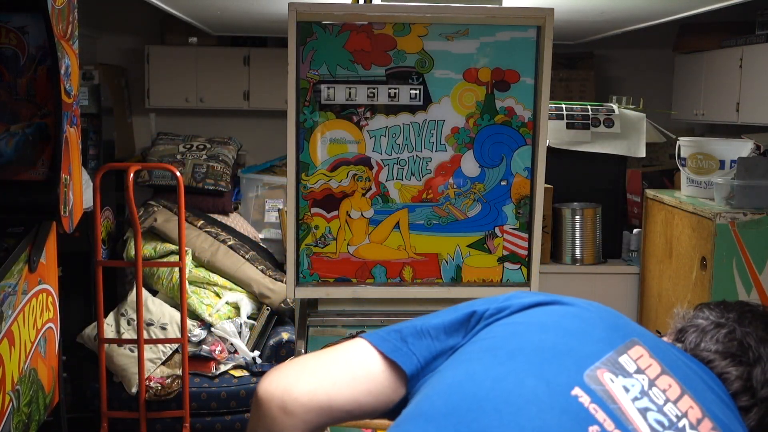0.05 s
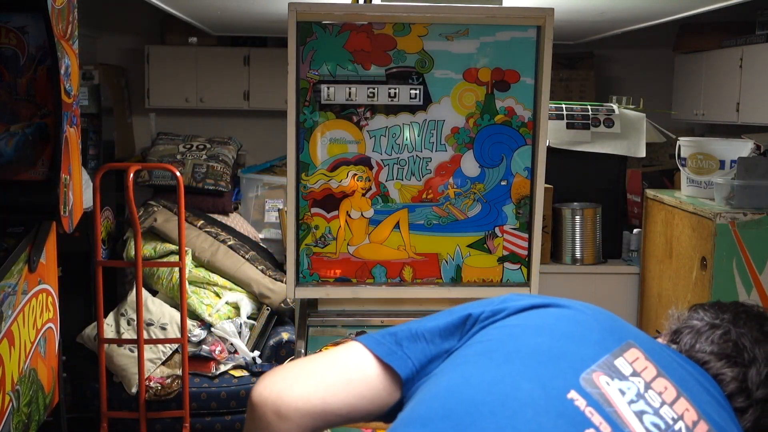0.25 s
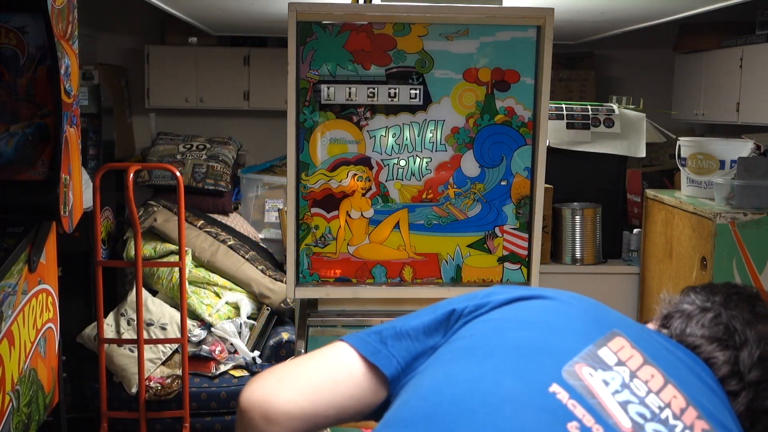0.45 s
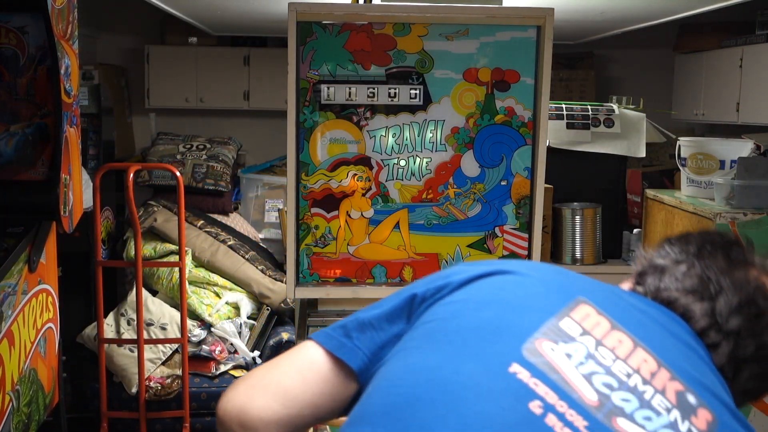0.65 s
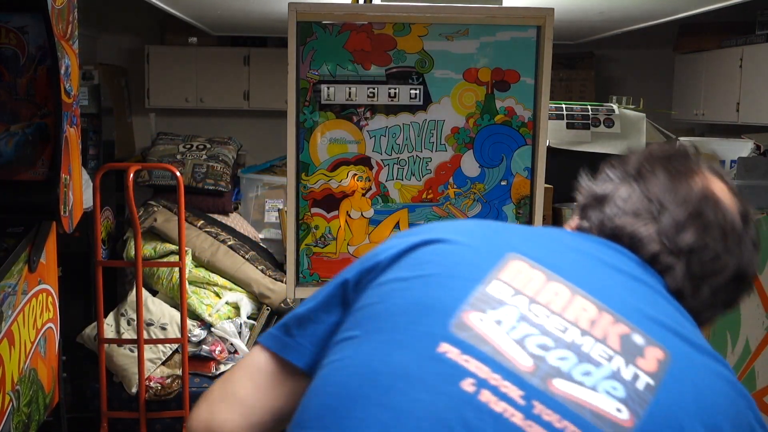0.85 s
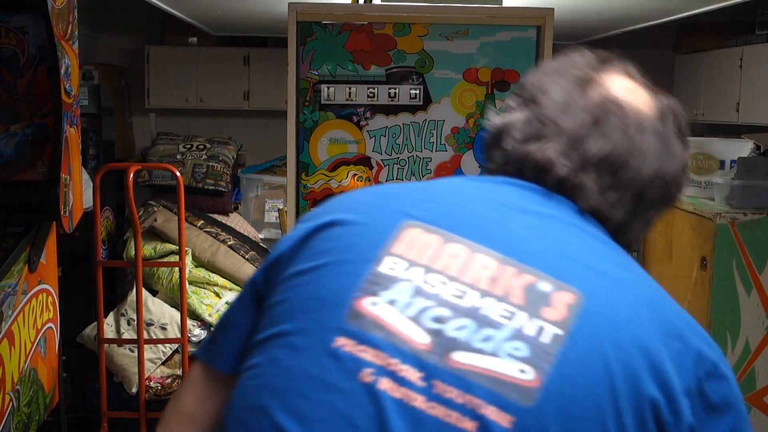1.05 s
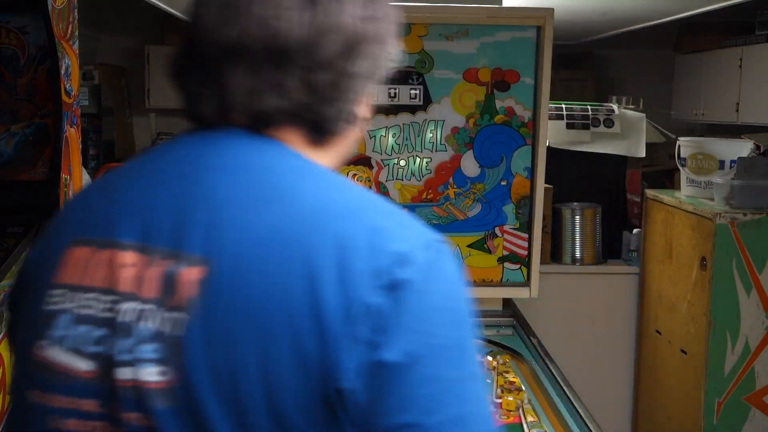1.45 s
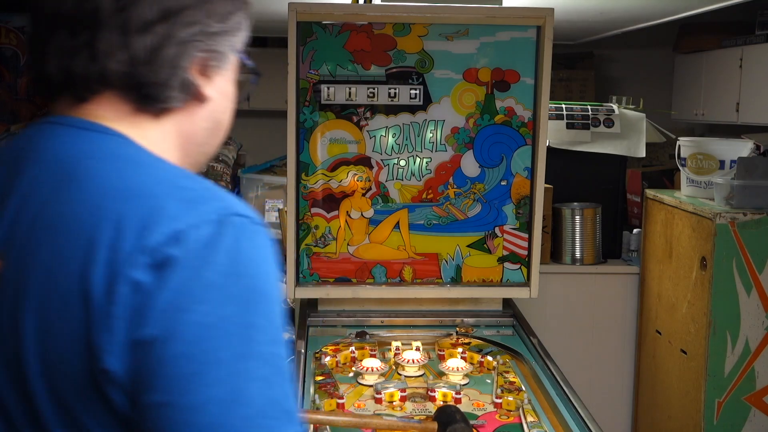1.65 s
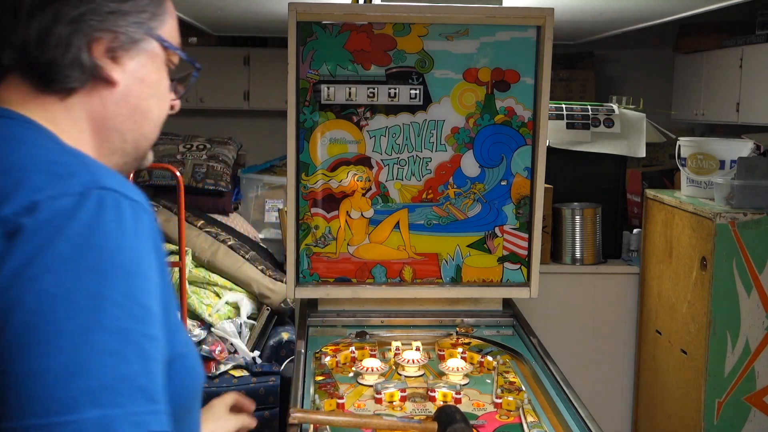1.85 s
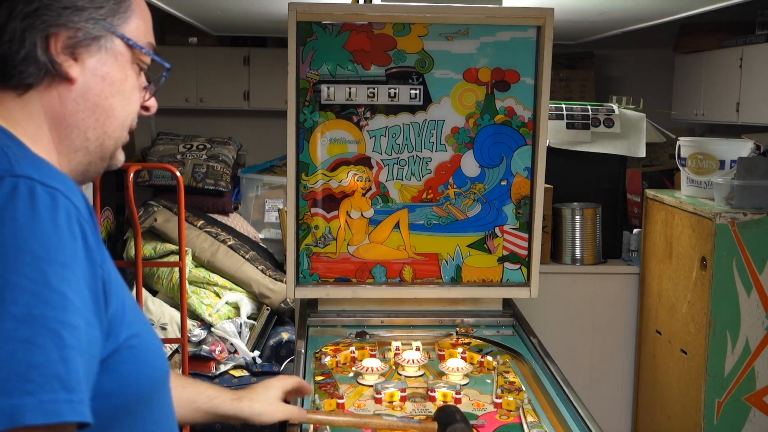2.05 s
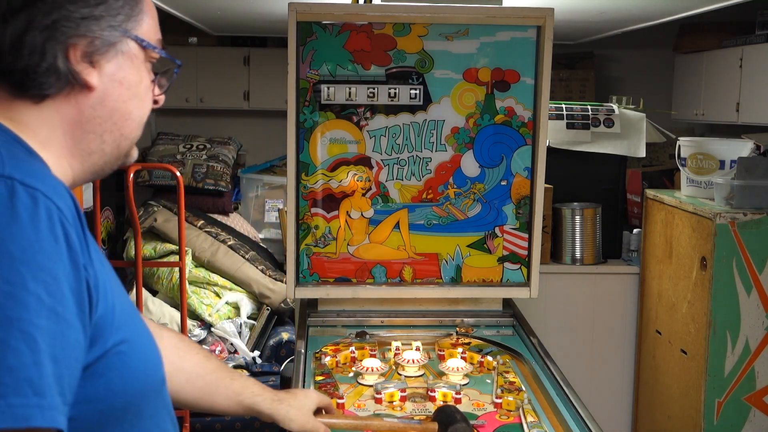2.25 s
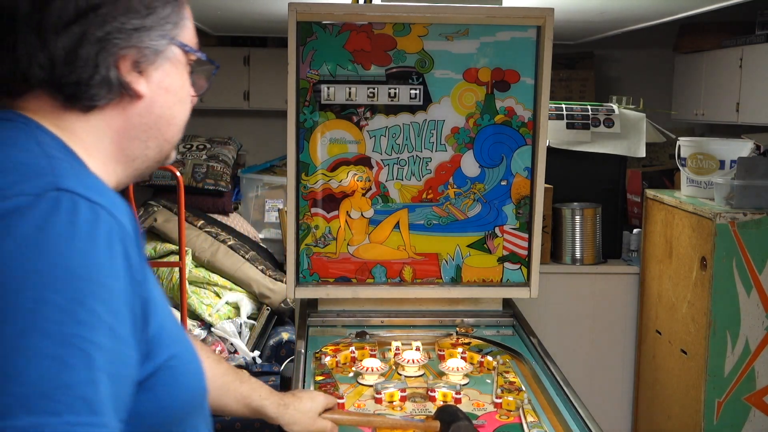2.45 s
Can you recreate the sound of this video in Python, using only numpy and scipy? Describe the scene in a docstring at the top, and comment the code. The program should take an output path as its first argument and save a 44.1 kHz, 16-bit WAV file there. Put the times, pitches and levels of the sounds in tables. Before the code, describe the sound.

A pinball machine resets nearby in a small, faintly humming room. From 0.2 seconds, relays snap rapidly over a whirring motor, with three score reel clacks between 0.4 and 0.8. Around 1.1 comes a louder metallic clatter with a brief buzz and a thin spring ping. At 1.4 the ball is kicked out, knocking on wood; it rolls softly, clicks, and lands with a clunk near 2.2.

```python
"""A small basement workshop, where an electromechanical pinball machine resets over a low hum.
Relays snap, the score motor whirs and steps the score reels three times, a relay bank resets and
a spring pings. A solenoid kicks the ball out; it rolls across the wood and lands with a clunk.
Every hit is one contact and a short chatter, ringing the resonances of the part it strikes."""
import sys
import numpy as np
from scipy import signal
from scipy.fft import rfft, irfft
from scipy.io import wavfile
from scipy.ndimage import uniform_filter1d

SR = 44100
rng = np.random.default_rng(int(sys.argv[2]) if len(sys.argv) > 2 else 0)


def wav_record(signal):
    """Record a signal, one row per channel, as 16-bit PCM in the file named by sys.argv[1]."""
    frames = np.transpose(np.atleast_2d(signal))
    bounded = np.clip(frames, -1, 1)
    # unit amplitude maps onto the largest positive 16-bit level
    quanta = np.round(bounded * 32767).astype(np.int16)
    wavfile.write(sys.argv[1], SR, quanta)


N = 110250
T = np.arange(N) / SR
MONO_BELOW_HZ, TREBLE_HZ = 560, 3980
BUILD_CYCLES = 2  # low notes swell more slowly than high ones
LEFT_RIGHT = np.array([[1], [-1]])


def amp(db):
    """Decibels to gain."""
    return 10 ** (np.asarray(db) / 20)


def along(table, hz, column=1):
    """Read a table column on a log-frequency axis."""
    table = np.array(table, float)
    return np.interp(np.log(np.maximum(hz, 1)), np.log(table[:, 0]), table[:, column])


def running(on_s, off_s, attack_s, release_s):
    """Rise, hold and exponential release."""
    return np.clip((T - on_s) / attack_s, 0, 1) * np.exp(-np.maximum(T - off_s, 0) / release_s)


def waver(rate_hz, depth_db):
    """A gain that drifts at random."""
    hold = int(SR / rate_hz)
    steps = np.repeat(rng.standard_normal(N // hold + 1), hold)
    return amp(depth_db * uniform_filter1d(steps, hold)[:N])


# Stereo image: f/Hz, left minus right/dB, side share/0-1
STEREO = [(600, -.2, .018), (1300, -.7, .028), (2400, -1.3, .085), (4400, -7, .4), (9000, -5.3, .28)]
def noise(colour, width=1, size=N):
    """Coloured noise at rms 1: centred in the bass, wider and to the right in the treble."""
    hz = np.fft.rfftfreq(size, 1 / SR)
    mid, side = np.exp(2j * np.pi * rng.random((2, len(hz))))
    spread = np.minimum(hz / MONO_BELOW_HZ, 1) ** 3
    side_share = spread * np.clip(width * along(STEREO, hz, column=2), 0, .5)
    pair = np.sqrt(1 - side_share) * mid + LEFT_RIGHT * np.sqrt(side_share) * side
    pan = amp(spread * LEFT_RIGHT * along(STEREO, hz) / 2)
    wash = irfft(pair * pan * amp(along(colour, hz)), size)
    return wash / np.sqrt(np.mean(wash ** 2))


def tone(t, hz, t60, phase):
    """One mode that swells within a few cycles and dies away."""
    pan = amp((hz > MONO_BELOW_HZ) * LEFT_RIGHT * along(STEREO, hz) / 2)
    envelope = -np.expm1(-t * hz / BUILD_CYCLES) * amp(-60 * t / t60)
    return pan * np.sqrt(2) * np.sin(2 * np.pi * (hz * t + phase)) * envelope


# Tail of machine and room, per band: f/Hz, t60/s
TAIL = [(110, 0.59), (600, 0.38), (2000, 0.31), (5000, 0.35), (12000, 0.28)]
def ring(body, modes, tail_scale, modes_db, bite=1):
    """A part's answer to one contact: a noisy tail that dies band by band, plus clear modes."""
    size = 32768
    t, hz = T[:size], np.fft.rfftfreq(size, 1 / SR)
    spectrum = rfft(noise(body, size=size))
    direct = 1 + (bite - 1) * np.exp(-t / 0.0069)  # direct sound sharpens the treble attack
    out = 0
    for k, (band_hz, t60) in enumerate(TAIL):
        band = along([(row[0], j == k) for j, row in enumerate(TAIL)], hz)
        envelope = -np.expm1(-t * band_hz / BUILD_CYCLES) * amp(-60 * t / (t60 * tail_scale))
        out += irfft(spectrum * band, size) * envelope * (direct if band_hz > TREBLE_HZ else 1)
    for mode_hz, db, t60 in modes:
        out += amp(db + modes_db) * tone(t, mode_hz, t60, rng.random())
    return out


def strike(hits, part, bass_hz=266):
    """Each hit is one contact and a dying chatter of smaller ones, all ringing the same part."""
    chatter_per_s, chatter_share = 700, 0.45
    out, size = np.zeros((2, N + SR)), part.shape[1]
    hz, response = np.fft.rfftfreq(size, 1 / SR), rfft(part)
    bass_shelf = 1 / (1 + (hz / bass_hz) ** 4)
    treble_shelf = 1 - 1 / (1 + (hz / TREBLE_HZ) ** 4)
    lead = SR // 100  # space for the shelves' pre-ring
    for start, db, bass_db, treble_db, chatter_s in hits:
        contacts = (rng.random(size) < chatter_per_s / SR) * rng.standard_normal(size)
        contacts *= np.exp(-T[:size] / chatter_s)
        contacts *= np.sqrt(chatter_share / (np.sum(contacts ** 2) + 1e-12))
        contacts[0] += np.sqrt(1 - chatter_share)
        hit = rfft(contacts) * response
        hit *= np.linalg.norm(response) / np.linalg.norm(hit)
        hit *= amp(db + bass_shelf * bass_db + treble_shelf * treble_db)
        at = int(start * SR) - lead
        out[:, at:at + size] += np.roll(irfft(hit, size), lead, axis=1)
    return out[:, :N]


# Room air colour, then hum and whine: f/Hz, level/dB
AIR_COLOUR = [(30, -28.5), (103, 2.5), (184, -7), (430, -14.5), (684, -12), (1190, -20.5), (2010, -14),
              (2980, -19), (3580, -29.5), (16000, -35)]
HUM_TONES = [(122, -61.5), (2040, -67)]
def room_tone():
    """A wide, quiet bed of air with electrical hum and a faint whine."""
    hum = 0
    for hz, db in HUM_TONES:
        sine = np.sqrt(2) * np.sin(2 * np.pi * (hz * T + rng.random()))
        hum += amp(db) * sine * waver(5.7, depth_db=1)
    return noise(AIR_COLOUR, width=4.7) * amp(-55) + hum


# Rumble colour: f/Hz, level/dB
ROLL_COLOUR = [(80, -27), (125, -3), (155, -26), (188, 12), (230, -7), (500, -10.5), (900, -17),
               (1400, -26), (2400, -16.5), (3100, -33), (4200, -54)]
def rolling_ball():
    """The steel ball rumbles unevenly over the wood."""
    rumble = waver(20, depth_db=2.5) * noise(ROLL_COLOUR) * amp(-51)
    return rumble * running(1.6, 2.285, attack_s=0.094, release_s=0.09)


# Gear whir colour: f/Hz, level/dB
WHIR_COLOUR = [(50, -24.5), (95, -5.5), (200, -4), (300, -6), (430, 1), (620, 3.5), (900, -22), (2300, -13),
               (4000, -31), (15000, -32)]
def score_motor():
    """Gears whir as the motor starts, runs and coasts out; a thin squeal rides on its first turn."""
    whir = noise(WHIR_COLOUR) * amp(-32) * waver(40.4, depth_db=1)
    whir *= running(0.1904, 1.243, attack_s=0.054, release_s=0.09)
    squeal_colour = [(12130, -70), (12670, 0), (13030, 0), (13570, -70)]  # f/Hz, level/dB
    squeal = noise(squeal_colour) * amp(-44) * running(.25, .57, attack_s=.02, release_s=0.036)
    return whir + squeal


def bank_coil(mains_hz=60):
    """The reset coil shakes the cabinet at mains harmonics while it pulls."""
    buzz = sum(np.sin(2 * np.pi * (k * mains_hz * T + rng.random())) for k in (2, 3))
    return buzz * amp(-25.5) * running(1.11, 1.122, attack_s=.03, release_s=0.004)


# Blade pings: t/s, f/Hz, level/dB, t60/s
PINGS = [(.201, 2615, -27, 0.056), (.918, 2002, -19, 0.085), (.923, 2105, -18.5, 0.131),
         (1.061, 2315, -17.5, 0.081)]
def switch_blades():
    """Flicked switch blades ring briefly, each at its own pitch."""
    return sum(amp(db) * tone(np.maximum(T - start, 0), hz, t60, rng.random())
               for start, hz, db, t60 in PINGS)


# Spring flick: t/s, level/dB, bass/dB, treble/dB, chatter/s
SPRING_HITS = [(1.166, -20, -13, 3.5, 0.00304)]
# Its colour: f/Hz, level/dB; its mode: f/Hz, level/dB, t60/s
SPRING_COLOUR = [(6000, -16), (9200, -11.5), (10000, 4), (11000, 0), (11700, -6), (15000, -27)]
SPRING_TONES = [(10025, -12, 0.18)]
def spring():
    """A flicked spring gives a thin, very high ping."""
    return strike(SPRING_HITS, ring(SPRING_COLOUR, SPRING_TONES, tail_scale=0.59, modes_db=2))


# Steel on metal: t/s, level/dB, bass/dB, treble/dB, chatter/s
CLICK_HITS = [(2.0965, -28.5, -3, -3, 0.0027)]
# Its colour: f/Hz, level/dB; its modes: f/Hz, level/dB, t60/s
CLICK_COLOUR = [(60, -60), (170, -3.5), (300, -8), (492, -25), (803, -13), (1140, -23), (2700, -19),
                (4860, -35.5), (6580, -28.5), (9130, -39), (11000, -28), (16000, -40)]
CLICK_TONES = [(131.3, -15, 0.63), (186, -7, 0.64), (1323, -14.5, 0.4), (6600, -15, 0.05)]
def ball_click():
    """The ball clicks against metal just before it lands."""
    return strike(CLICK_HITS, ring(CLICK_COLOUR, CLICK_TONES, tail_scale=1, modes_db=6, bite=2.7))


# Kick and knocks: t/s, level/dB, bass/dB, treble/dB, chatter/s
KICK_HITS = [(1.4135, -14.5, -7.5, 3, 0.00073), (1.4189, -29, 14, -2, 0.0026),
             (1.433, -14, 0.5, -4, 0.0022), (1.465, -17.5, 1, -13.5, 0.012),
             (1.516, -21, -1.5, -34, 0.0019), (1.558, -40.5, -0.5, -9, 0.0044)]
# Cabinet colour: f/Hz, level/dB; its modes: f/Hz, level/dB, t60/s
WOOD_COLOUR = [(40, -40), (70, -29), (120, -8.5), (155, -23), (190, -5.5), (320, -10.5), (790, -7),
               (1090, -10), (1850, -11), (3000, -19), (4500, -25), (6000, -31), (9450, -36.5), (12000, -29),
               (16000, -30.5)]
WOOD_TONES = [(126.5, -19, 0.46), (184.3, -7.5, 0.38), (258.4, -16, 0.32), (431.5, -22.5, 0.33),
              (890.2, -16.5, 0.3)]
def ball_kicker():
    """A solenoid kicks the ball, which knocks against the wooden cabinet."""
    return strike(KICK_HITS, ring(WOOD_COLOUR, WOOD_TONES, tail_scale=0.73, modes_db=2, bite=1.96))


# Clunk and bounce: t/s, level/dB, bass/dB, treble/dB, chatter/s
CLUNK_HITS = [(2.156, -22.5, 0.5, -17.5, 0.009), (2.204, -33, 10, -1.5, 0.0011)]
# Wood modes under the ball: f/Hz, level/dB, t60/s
CLUNK_TONES = [(131.4, -7.5, 0.41), (188.7, -5.5, 0.28), (261, -10.5, 0.35), (446, -9, 0.25),
               (688, -6.5, 0.17), (1057, -13, 0.16), (1720, -4.5, 0.21)]
def ball_landing():
    """The ball drops onto the cabinet's wood and bounces once."""
    return strike(CLUNK_HITS, ring(WOOD_COLOUR, CLUNK_TONES, tail_scale=0.66, modes_db=-1.5))


# Relay snaps: t/s, level/dB, bass/dB, treble/dB, chatter/s
RELAY_HITS = [(0.101, -42, 3, -11.5, 0.0053), (.201, -31.5, -19, 9, 0.008), (.215, -24, -10, 7, 0.0034),
              (.224, -19.5, 3.5, -8, 0.038), (0.38, -24.5, 2, -5.5, 0.0087),
              (.545, -24.5, -5.5, -7, 0.0017), (.703, -26.5, -1, -4.5, .0015), (.736, -34.5, -2, 6, .001),
              (.858, -28.5, 5, -3, .002), (0.904, -25.5, 11, 12, 0.0044), (0.921, -17, -16, -11, 0.0034),
              (1.023, -26, -4, -5, 0.0039), (1.250, -23.5, 3, -7, 0.0074), (1.318, -26.5, -9, -23, 0.022),
              (1.354, -23, -8, -21, 0.0055), (1.4133, -17, -10, -1.5, .001)]
# Their colour: f/Hz, level/dB; their modes: f/Hz, level/dB, t60/s
RELAY_COLOUR = [(40, -41), (75, -26.5), (218, -1.5), (353, -21), (601, -11), (905, -10), (1700, -9.5),
                (2110, -7.5), (3410, -20.5), (12300, -26), (16000, -25)]
RELAY_TONES = [(676, -22, 0.16), (1448, -19.5, 0.11), (2137, -20, 0.23), (2486, -16, 0.062)]
def relays():
    """Armatures and pawls snap, each with a ring of its own."""
    return sum(strike([hit], ring(RELAY_COLOUR, RELAY_TONES, tail_scale=0.71, modes_db=11))
               for hit in RELAY_HITS)


# Bank clatter: t/s, level/dB, bass/dB, treble/dB, chatter/s
BANK_HITS = [(1.059, -16.5, -30, 3.5, 0.014), (1.094, -14, 5, 1.5, 0.0087), (1.120, -14.5, 9, -11, 0.013),
             (1.185, -23.5, -8, 5, 0.0084)]
# Its colour: f/Hz, level/dB; its modes: f/Hz, level/dB, t60/s
BANK_COLOUR = [(45, -50), (175, -11.5), (380, -24), (711, -6.5), (1020, -9.5), (1740, -7.5), (2490, -2),
               (5670, -26.5), (10900, -22), (16000, -21)]
BANK_TONES = [(718, -5.5, 0.12), (1439, -15.5, 0.5), (1844, -18.5, 0.93), (2976, -10, 0.17),
              (3302, -15, 0.19)]
def relay_bank():
    """The relay bank is pushed back and latches with a lingering clang."""
    return sum(strike([hit], ring(BANK_COLOUR, BANK_TONES, tail_scale=1.18, modes_db=-1.5))
               for hit in BANK_HITS)


# Pull-in and drop-back by turns: t/s, level/dB, bass/dB, treble/dB, chatter/s
REEL_HITS = [(.430, -18, 5.5, 7, 0.0098), (.504, -23.5, 7, 7, 0.0026), (.593, -13.5, -3.5, 3.5, 0.028),
             (.660, -25.5, 11.5, 6.5, 0.0011), (.746, -15.5, 0.5, 2.5, 0.0076),
             (.805, -25, 8.5, 6.5, 0.0018)]
# Reel colour: f/Hz, level/dB; its modes: f/Hz, level/dB, t60/s
REEL_COLOUR = [(50, -59), (213, -5.5), (329, -7), (398, -9), (450, -11), (690, -1.5), (950, -4.5),
               (1210, -5.5), (1500, -6.5), (2200, -6), (3600, -20), (7570, -36.5), (11500, -25),
               (16000, -33)]
REEL_TONES = [(209.6, -25, 0.49), (389, -13, 0.2), (689, -8, 0.16), (757, -17.5, 0.42), (1163, -6, 0.13),
              (1201, -5, 0.17)]
def score_reels():
    """Three steps: the solenoid pulls in with a clack and drops back with a softer, woodier knock."""
    reel = ring(REEL_COLOUR, REEL_TONES, tail_scale=0.89, modes_db=0, bite=1.62)
    return strike(REEL_HITS, reel, bass_hz=733)


def scene():
    """The machine's hits over its buzz, whir and rumble and the room tone."""
    hits = score_reels() + relays() + relay_bank() + ball_kicker() + ball_click() + ball_landing()
    pings = spring() + switch_blades()
    return hits + pings + bank_coil() + score_motor() + rolling_ball() + room_tone()


def record(dry):
    """A limiter ducks at loud peaks and recovers slowly; the very top is cut."""
    drive_db, limit_db, release_s, top_hz = 3.5, -3, 2.8, 15900
    driven = dry * amp(drive_db)
    log_peak = np.log(np.abs(driven).max(axis=0) + 1e-9)
    held_peak = np.exp(np.maximum.accumulate(log_peak + T / release_s) - T / release_s)
    gain = uniform_filter1d(np.minimum(1, amp(limit_db) / held_peak), size=90)
    return signal.sosfilt(signal.ellip(10, .2, 80, top_hz, fs=SR, output="sos"), driven * gain)


dry = scene()
out = record(dry)
wav_record(out)
```